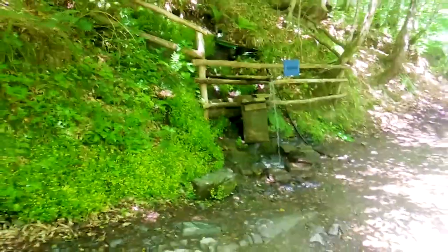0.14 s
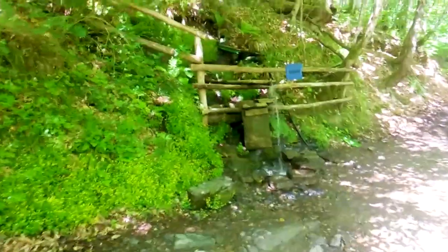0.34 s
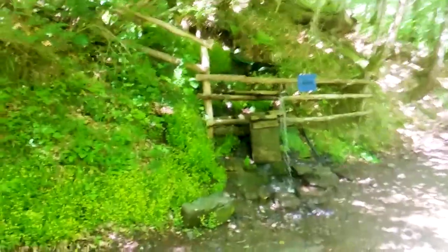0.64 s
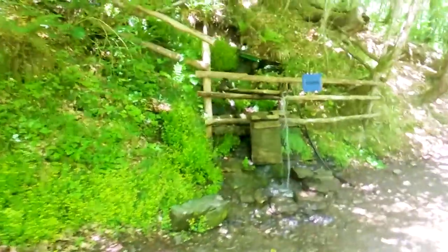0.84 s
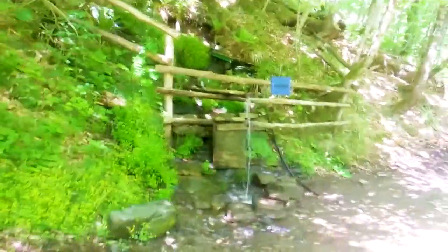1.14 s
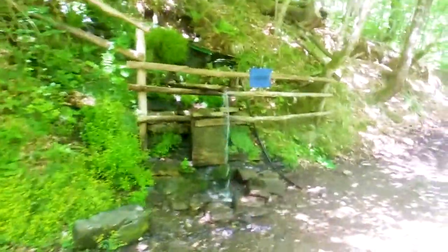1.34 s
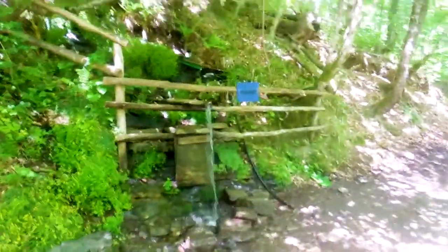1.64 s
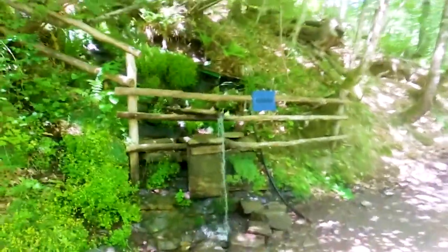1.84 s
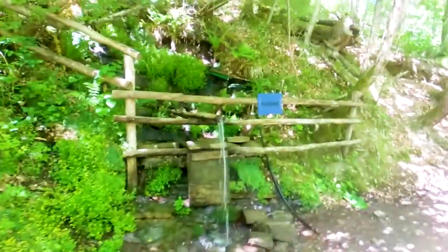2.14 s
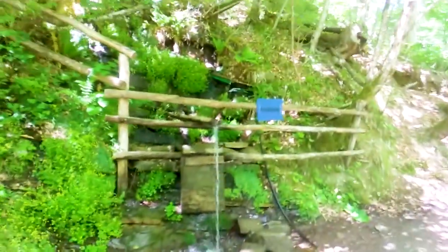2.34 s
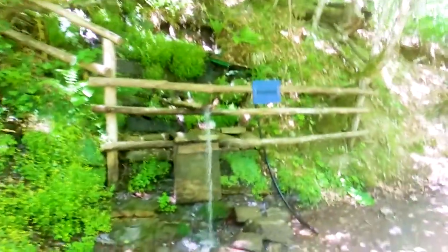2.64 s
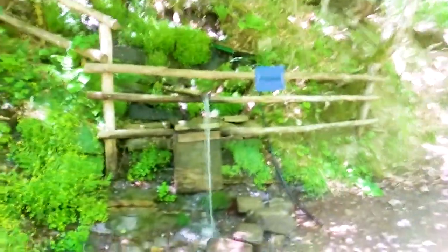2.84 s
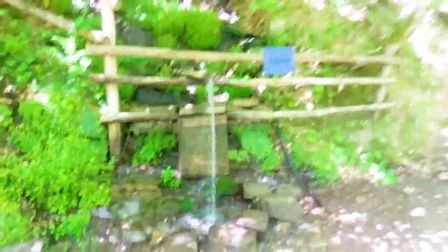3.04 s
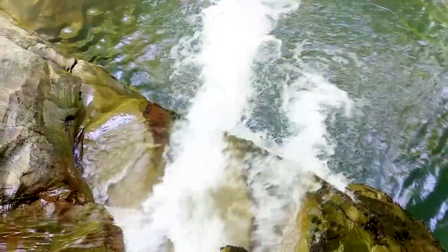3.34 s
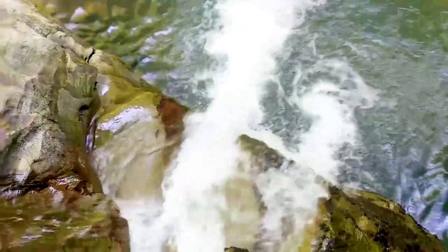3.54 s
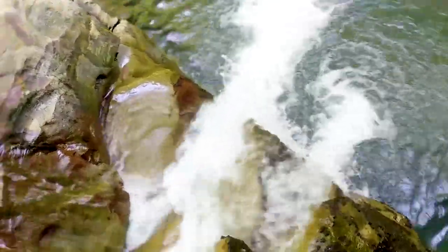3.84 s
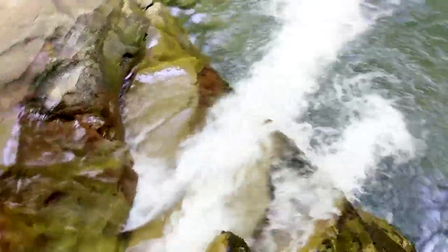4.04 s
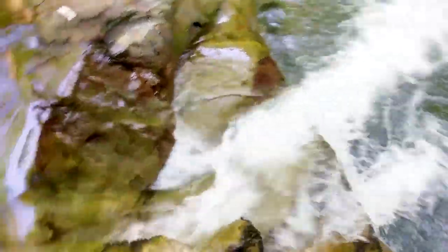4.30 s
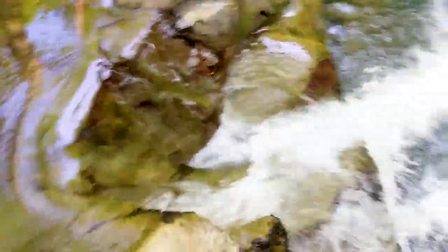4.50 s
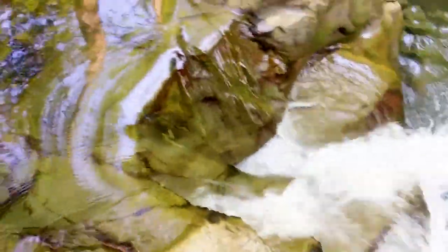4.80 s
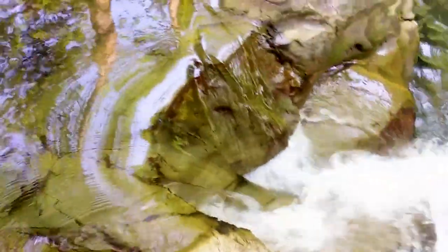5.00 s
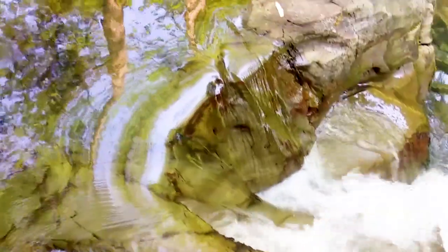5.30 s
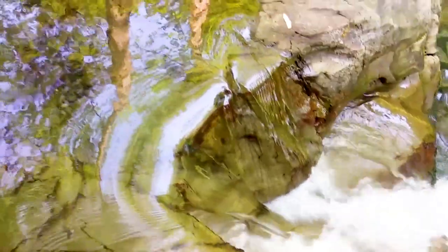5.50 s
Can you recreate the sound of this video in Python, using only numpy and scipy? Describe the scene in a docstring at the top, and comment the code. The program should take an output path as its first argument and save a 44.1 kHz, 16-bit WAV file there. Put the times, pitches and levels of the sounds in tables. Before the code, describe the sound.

A thin jet of spring water spatters brightly on wet stones with splats and plops, then a louder, gurgling mountain stream pours between boulders.

```python
"""Beside a spring spout: a thin jet spatters on wet stones, with sharp splats, small bubbles, plops and knocks.
After a moment of silence a mountain stream fades in, close by, pouring between boulders into a pool.
Water noise is built from random puffs of hiss (drops) and swarms of chirping sines (bubbles), shaped by spectra.
Single splats, knocks, plops, glugs and slops are placed one by one. Both places are heard in mono."""
import sys
import numpy as np
from scipy import signal
from scipy.fft import rfft, irfft, next_fast_len
from scipy.io import wavfile
from scipy.ndimage import map_coordinates

SR = 44100
rng = np.random.default_rng(int(sys.argv[2]) if len(sys.argv) > 2 else 0)


def dump(signal):
    """Clip the signal to [-1, 1] and save it as 16-bit WAV at the path in sys.argv[1]."""
    limited = np.clip(np.atleast_2d(signal).T, -1, 1)
    pcm = np.round(limited * 32767).astype(np.int16)
    wavfile.write(sys.argv[1], SR, pcm)


N = 249606
TIME = np.arange(N) / SR
SPRING_END, STREAM_START = 3.2375, 3.281  # seconds; silence in between


def amp(db):
    """Decibels to gain."""
    return 10 ** (np.asarray(db) / 20)


def unit(x):
    """Scale to rms 1."""
    return x / np.sqrt(np.mean(x ** 2) + 1e-20)


def curves(rows):
    """One value per sample for each column after the time."""
    seconds, *columns = np.transpose(rows)
    return [np.interp(TIME, seconds, column) for column in columns]


def wobble(rate):
    """A smooth random curve, rate knots a second."""
    return map_coordinates(rng.standard_normal(400), [TIME * rate], mode="wrap")


def filtered(x, response):
    """x times a response of frequency."""
    m = next_fast_len(N + 8192)
    return irfft(rfft(x, m) * response(np.fft.rfftfreq(m, 1 / SR)), m)[:N]


def coloured(x, spectrum):
    """x through a (Hz, dB) spectrum, at rms 1."""
    f, db = np.transpose(spectrum)
    return unit(filtered(x, lambda hz: amp(np.interp(np.log(hz + 1), np.log(f), db))))


def bell(hz, centre_hz, octaves):
    """A band of 1 at its centre, falling off as a Gaussian over octaves."""
    return np.exp(-.5 * (np.log2((hz + 1) / centre_hz) / octaves) ** 2)


def swept(x, band):
    """x with one moving band raised or lowered."""
    hz, t, z = signal.stft(x, SR, nperseg=512)
    seconds, *columns = np.transpose(band)
    centre_hz, db, octaves = (np.interp(t, seconds, column) for column in columns)
    gain = amp(db * bell(hz[:, None], centre_hz, octaves))
    return signal.istft(z * gain, SR, nperseg=512)[1][:N]


def patchy(x, depth_db, width_hz, life):
    """Splashes shift about, so narrow bands swell and fade on their own (life in s). Rms 1."""
    hz, t, z = signal.stft(x, SR, nperseg=1024)
    knots = rng.standard_normal((300, 300))
    grid = np.meshgrid(hz / width_hz, t / life, indexing="ij")
    field = map_coordinates(knots, grid, order=1, mode="wrap")
    return unit(signal.istft(z * amp(depth_db * unit(field)), SR, nperseg=1024)[1][:N])


def add(track, s, sound):
    """Mix a sound into the track at time s."""
    part = track[max(round(s * SR), 0):][:len(sound)]
    part += sound[:len(part)]


def bubble(t, hz, cycles, rise):
    """A pocket of air rings, 60 dB down after some cycles; its pitch climbs as it nears the surface."""
    age = t * hz / cycles
    tone = np.sin(2 * np.pi * hz * t * (1 + rise * np.minimum(age, 2) / 2))
    return tone * amp(-60 * age) * (1 - np.exp(-2 * t * hz))


def bubbles(rate, low_hz, high_hz, cycles, rise, spread_db):
    """A swarm, rate a second, of random size and strength, even in energy per Hz, at rms 1."""
    when, size, strength, sign = rng.random((int(rate * N / SR), 4)).T[..., None]
    hz = low_hz * (high_hz / low_hz) ** size
    k = np.arange(int(cycles / low_hz * SR))
    strength_gain = amp(-spread_db * np.log(np.maximum(strength, 1 / 50)))
    rings = hz * strength_gain * np.sign(sign - .5) * bubble(k / SR, hz, cycles, rise)
    positions = (when * N).astype(int) + k
    return unit(np.bincount(positions.ravel(), rings.ravel(), N)[:N])


def spray(rate, t60, spread_db):
    """Drops land at random, rate a second; each bursts into a short puff of hiss. Rms 1."""
    chance, strength = rng.random((2, N))
    hits = (chance < rate / SR) * amp(-spread_db * np.log(np.maximum(strength, 1 / 100))) ** 2
    power = signal.lfilter([1], [1, -amp(-120 / (t60 * SR))], hits)
    return unit(np.sqrt(power) * rng.standard_normal(N))


# How hard the wandering jet strikes bare stone. Each row: time in seconds, relative level of its spatter in dB.
JET_FORCE = [(0, -34.5), (0.08, -37.5), (0.18, -31.5), (0.32, -33.5), (0.55, -32.5), (0.64, -36.5),
             (0.76, -32.5), (0.9, -34), (1.03, -35.5), (1.13, -33.5), (1.24, -34.5), (1.3, -32),
             (1.45, -35), (1.57, -32), (1.87, -33.5), (1.92, -36), (2.03, -32.5), (2.07, -34.5),
             (2.42, -32.5), (2.5, -34.5), (2.55, -33), (2.64, -35.5), (2.76, -32.5), (2.9, -33),
             (3.22, -32)]
# Spectra of the spatter on stone, the finest spray and the stirred puddle.
# Each row: frequency in Hz, relative density in dB per Hz.
SPATTER_SPECTRUM = [(710, -48), (1200, -19), (1300, -21.5), (1470, -5.5), (1820, -2.5), (2500, 2),
                    (3790, -3), (4120, -1), (5970, -1.5), (8640, 2.5), (9930, 1), (11000, -9), (14300, -37),
                    (22000, -120)]
MIST_SPECTRUM = [(9000, -10), (10800, 0.5), (12500, 2), (15000, 3), (16000, -31)]
PUDDLE_SPECTRUM = [(60, -50), (125, -26), (160, -8.5), (236, -1), (350, 1), (450, -4), (880, 1),
                   (1170, -4.5), (1450, -5.5), (1900, -8), (3000, -80)]
# The spatter starts out hollow in the midrange.
# Each row: time in seconds, centre in Hz, gain in dB, width in octaves.
MIDRANGE_HOLLOW = [(0.15, 1600, -6.5, 0.14), (0.45, 1450, 1, 0.14), (0.85, 1500, 2.5, 0.23),
                   (2.0, 1420, 5, 0.14)]
MIST_DB, MIST_GROWS = -38.5, 0.93  # usual level; dB gained per dB of spatter
PUDDLE_DB, PUDDLE_WANDER_DB = -39.5, 1  # stirred evenly, with a slight random swell


def spring():
    """The jet breaks into drops that spatter on stone and stir a shallow puddle; striking harder makes more mist."""
    spatter_db, = curves(JET_FORCE)
    mist_db = MIST_DB + MIST_GROWS * (spatter_db - spatter_db[TIME < SPRING_END].mean())
    puddle_db = PUDDLE_DB + PUDDLE_WANDER_DB * wobble(rate=9.87)

    drops = spray(rate=1500, t60=0.15, spread_db=1.5)
    tinkle = bubbles(rate=220, low_hz=1410, high_hz=4743, cycles=170, rise=0.076, spread_db=0.0)
    # tiny bubbles snap on the wet stone
    pips = bubbles(rate=420, low_hz=1395, high_hz=9240, cycles=11, rise=0.055, spread_db=2.5)
    splashing = patchy(drops + amp(-15.5) * tinkle, depth_db=2.8, width_hz=70, life=.045)
    spatter = coloured(splashing + amp(-9) * pips, SPATTER_SPECTRUM)

    ticks = spray(rate=130, t60=0.005, spread_db=3.0)  # stray droplets land on drier stone
    fine_drops = patchy(drops, depth_db=5.0, width_hz=99, life=0.043)
    mist = coloured(fine_drops + amp(-6) * ticks, MIST_SPECTRUM)

    burble = bubbles(rate=110, low_hz=220.5, high_hz=1518, cycles=73, rise=0.23, spread_db=4.0)
    stir = rng.standard_normal(N) + amp(-18.0) * burble
    puddle = coloured(patchy(stir, depth_db=3.0, width_hz=68.7, life=.07), PUDDLE_SPECTRUM)

    mix = amp(spatter_db + 3.0) * spatter + amp(mist_db) * mist + amp(puddle_db) * puddle
    return swept(mix, MIDRANGE_HOLLOW)


# Drops that slap bare stone.
# Each row: start in seconds, relative level in dB, centre in Hz, width in octaves.
STONE_SPLATS = [(0.173, -15, 7800, 0.5), (0.58, -21, 1300, 0.85), (0.7383, -11, 8400, .4),
                (1.016, -19, 9000, 0.64), (1.183, -15, 6800, 0.31), (1.4601, -21, 7700, 0.27),
                (1.4761, -19, 8500, .3), (1.496, -13, 8440, .35), (1.6733, -20, 8530, 0.22),
                (1.755, -15, 8700, 0.23), (1.993, -16, 7600, 0.34), (2.297, -14, 9900, 0.37),
                (2.405, -15, 10200, 0.36), (2.4623, -17, 9560, 0.24), (2.683, -19, 8700, .3),
                (2.721, -12.5, 10000, .28), (2.754, -10.5, 8950, 0.4), (2.794, -16.5, 7900, .2),
                (2.8424, -16, 9700, 0.2), (2.912, -18, 7000, 0.19), (2.9832, -21, 8700, 0.28),
                (3.018, -16, 7900, .2), (3.0445, -13.5, 10500, 0.58), (4.965, -12.5, 9050, 0.2)]


def splats(t60=0.026, fallout_db=-12, fallout_t60=0.41):
    """The biggest drops crack on the stone in bands of hiss; their fragments patter in a weaker, longer tail."""
    out, t = np.zeros(N), np.arange(SR // 10) / SR
    hz = np.fft.rfftfreq(len(t), 1 / SR)
    fade = amp(-60 * t / t60) + amp(fallout_db - 60 * t / fallout_t60)
    for s, db, centre_hz, octaves in STONE_SPLATS:
        noise = rng.standard_normal(len(t))
        hiss = irfft(rfft(noise) * bell(hz, centre_hz, octaves))
        add(out, s, amp(db - 8.5) * unit(hiss) * fade)
    return out


# Dull knocks close by the microphone. Each row: start in seconds, relative level in dB, rise in seconds.
DULL_KNOCKS = [(0.2578, -19.5, .0002), (0.272, -30, 0.00086), (0.335, -26, .003), (0.424, -21, 0.0045),
               (0.438, -22, 0.0053)]
# What they ring with. Each row: frequency in Hz, relative level in dB, time to fall 60 dB in seconds.
RING_MODES = [(253, 1, 0.044), (483, 0.5, 0.019), (800, 0, 0.022), (1120, -1, 0.015), (1710, 1, 0.009)]


def knock():
    """Heavily damped bumps, the soft ones blurred; neighbouring modes start in opposite directions."""
    out, t = np.zeros(N), np.arange(SR // 8) / SR
    ring = np.zeros(len(t))
    for k, (hz, db, t60) in enumerate(RING_MODES):
        ring += (-1) ** k * amp(db - 60 * t / t60) * np.sin(2 * np.pi * hz * t)
    for s, db, rise in DULL_KNOCKS:
        add(out, s, amp(db) * ring * (1 - np.exp(-t / rise)))
    return out


# Drops that trap air in the water.
# Each row: start in seconds, relative level in dB, bubble pitch in Hz, further gain of the slap in dB.
WATER_PLOPS = [(0.6818, -22.5, 2710, -16), (0.7382, -20, 3290, -10), (0.7921, -26, 3200, -18),
               (1.0542, -19.5, 3690, -2), (1.1822, -14.5, 2620, -7), (1.54, -27, 1850, -14),
               (1.589, -25, 1470, -17), (1.6082, -18, 1520, -17), (1.6422, -21, 4200, -9),
               (1.7754, -22, 2410, -14), (2.1735, -16.5, 3980, -5), (2.7536, -19, 2410, -13),
               (2.855, -26, 955, -7), (2.9836, -15.5, 2180, -10), (3.0954, -18, 2400, -15),
               (3.1487, -19.5, 2320, -15), (3.154, -24, 920, -9), (5.2653, -13, 1630, -20),
               (5.272, -14, 3220, -15)]


def plops(cycles=55, slap_t60=0.023, slap_below=0.27, slap_octaves=0.31):
    """A drop slaps the water, a little lower in pitch than the bubble that it traps; the bubble chirps upward."""
    out, t = np.zeros(N), np.arange(SR // 12) / SR
    f = np.fft.rfftfreq(len(t), 1 / SR)
    for s, db, hz, slap_db in WATER_PLOPS:
        noise = rng.standard_normal(len(t))
        slap_hz = hz * 2 ** -slap_below  # slap_below is in octaves
        slap = irfft(rfft(noise) * bell(f, slap_hz, slap_octaves), len(t))
        add(out, s, amp(db + slap_db) * unit(slap) * amp(-60 * t / slap_t60))
        add(out, s, amp(db - 2.0) * bubble(t, hz, cycles, rise=0.07))
    return out


def fade_in(depth_db, length=0.22):
    """Gain that climbs in an S-curve from depth_db down to full as the stream begins (length in s)."""
    done = np.clip((TIME - STREAM_START) / length, 0, 1)
    return amp(-depth_db * (1 + np.cos(np.pi * done)) / 2)


# The surging of the chute. Each row: time in seconds, relative level of its rush in dB.
CHUTE_FLOW = [(3.5, -27), (3.56, -24.5), (3.59, -26.5), (3.64, -25), (3.8, -23.5), (3.89, -25.5),
              (4.04, -27.5), (4.13, -24), (4.33, -24), (4.45, -24.5), (4.67, -25), (4.76, -28), (4.85, -28),
              (4.91, -26), (5.02, -28), (5.12, -27.5), (5.18, -29.5), (5.28, -26), (5.43, -26.5),
              (5.47, -27), (5.55, -28.5), (5.63, -28.5)]
# The air driven under. Each row: time in seconds, relative level of the gurgle in dB.
AIR_FLOW = [(3.5, -26.5), (3.66, -24.5), (3.86, -21.5), (3.96, -29), (4.12, -24), (4.38, -25.5),
            (4.58, -20.5), (4.69, -27), (4.82, -23.5), (4.92, -26), (5.02, -29), (5.11, -22.5), (5.18, -26),
            (5.28, -23), (5.42, -24), (5.5, -24), (5.65, -26)]
# The microphone swings part of the way from the chute to the boulders.
# Each row: time in seconds, share turned from 0 to 1.
MICROPHONE_TURN = [(4.4, 0.07), (4.8, 0.47)]
# Spectra of gurgle, churn and foam, the last two also with the microphone turned.
# Each row: frequency in Hz, relative density in dB per Hz.
GURGLE_SPECTRUM = [(41, -72), (70, -54), (118, -20), (200, -6.5), (221, -2.5), (281, -6), (323, -3.5),
                   (400, -9), (546, -5), (646, -19), (750, -15.5), (980, -55), (1650, -120)]
CHURN_SPECTRUM = [(350, -31), (600, -0.5), (739, -7), (850, -1.5), (1160, -12.5), (1320, -8.5),
                  (1810, -9.5), (1960, -10), (2920, -11), (3600, -8), (4800, -23), (6240, -44),
                  (10600, -120)]
CHURN_TURNED_SPECTRUM = [(350, -27), (600, -6), (880, -5.5), (1100, -17), (1290, -3), (1680, -2.5),
                         (1990, -13), (2610, -7.5), (3190, -4), (4210, -24), (4800, -22), (6240, -38),
                         (10600, -120)]
FOAM_SPECTRUM = [(2470, -17), (4200, -0.5), (4910, -2.5), (5750, -1.5), (7820, 2), (9620, 1), (10600, -1.5),
                 (14200, -11.5), (15100, -10), (16000, -19)]
FOAM_TURNED_SPECTRUM = [(2470, -27), (4200, -4), (4970, 0.5), (6180, -6.5), (7690, 2), (10500, -8),
                        (11900, -0.5), (13800, -11), (15200, -9), (16000, -20)]
# The midrange of the churn fills in as the stream swells.
# Each row: time in seconds, centre in Hz, gain in dB, width in octaves.
CHURN_OPENING = [(3.35, 1390, -2, .6), (3.68, 1480, -2, 0.38), (3.82, 1400, 1.5, 0.77),
                 (4.3, 1560, -0.5, 0.32), (4.7, 1400, -1, 0.54)]
# A band of the foam's hiss shifts in pitch and strength as the microphone moves.
# Each row: time in seconds, centre in Hz, gain in dB, width in octaves.
FOAM_SHEEN = [(3.45, 6000, -3.5, .25), (4.02, 6100, 0, 0.19), (4.15, 6850, -0.5, 0.092),
              (4.35, 6660, 2.5, 0.12), (4.72, 5570, 5.5, 0.1), (4.98, 5400, -1.5, .1), (5.17, 5250, 2, .08),
              (5.26, 5200, 0.5, 0.23), (5.44, 5200, -0.5, 0.19), (5.495, 5170, -5.5, 0.25),
              (5.57, 5300, -2, 0.21), (5.63, 6300, 7.5, .08)]
CHURN_GROWS = 1.08  # dB of churn gained per dB of rush
GULP_DB = 1  # random swell of the gurgle


def stream():
    """The chute drives air under: big pockets gurgle; middling ones churn and foam bursts, both with the flow."""
    flow_db, = curves(CHUTE_FLOW)
    churn_db = flow_db.mean() + CHURN_GROWS * (flow_db - flow_db.mean())
    gurgle_db = curves(AIR_FLOW)[0] - 0.2 + GULP_DB * wobble(rate=14)
    turned = np.clip(curves(MICROPHONE_TURN)[0], 0, 1)

    def swing(x, facing, aside):
        """Crossfade between two spectra as the microphone turns."""
        return (1 - turned) * coloured(x, facing) + turned * coloured(x, aside)

    pockets = bubbles(rate=260, low_hz=179.9, high_hz=931, cycles=33.0, rise=0.095, spread_db=1.35)
    pouring = pockets + amp(4.5) * spray(rate=600, t60=0.05, spread_db=1.0)
    gurgle = coloured(patchy(pouring, depth_db=1.4, width_hz=63.5, life=.05), GURGLE_SPECTRUM)

    swarm = bubbles(rate=900, low_hz=667.5, high_hz=4570, cycles=57, rise=0.057, spread_db=1.0)
    froth = swarm + amp(9.0) * spray(rate=1300, t60=0.1, spread_db=0.5)
    froth = patchy(froth, depth_db=3.5, width_hz=55, life=.045)
    churn = swept(swing(froth, CHURN_SPECTRUM, CHURN_TURNED_SPECTRUM), CHURN_OPENING)

    fizz = patchy(spray(rate=1600, t60=0.099, spread_db=1.75), depth_db=3.0, width_hz=85, life=.07)
    foam = swept(swing(fizz, FOAM_SPECTRUM, FOAM_TURNED_SPECTRUM), FOAM_SHEEN)

    rush = amp(churn_db + 0.7) * churn + amp(flow_db + 2.0) * foam
    return fade_in(depth_db=12) * (amp(gurgle_db) * gurgle + rush)


# Large air pockets in the stream. Each row: start in seconds, relative level in dB, pocket pitch in Hz.
POCKET_GLUGS = [(3.305, -13.5, 397), (3.325, -14, 500), (3.535, -5.5, 225), (3.639, -8, 256),
                (3.747, -10.5, 265), (3.842, 3.5, 502), (3.862, -3, 875), (3.931, -9, 231),
                (4.014, -8.5, 244), (4.096, -1.5, 285), (4.104, -6, 820), (4.138, -1.5, 346),
                (4.196, -10, 240), (4.311, -1.5, 244), (4.412, -3, 294), (4.471, -2, 239), (4.52, -1, 322),
                (4.622, -7, 328), (4.757, -3, 263), (4.884, -8, 253), (4.915, -1, 307), (4.936, 6.5, 513),
                (5.2, 5.5, 221), (5.395, -1.5, 308), (5.604, 1, 245)]


def glugs(cycles=18, swell=0.012):
    """Single large air pockets swell up (swell in s) and boom in the pool."""
    out, t = np.zeros(N), np.arange(SR // 6) / SR
    for s, db, hz in POCKET_GLUGS:
        boom = bubble(t, hz, cycles, rise=0.067)
        add(out, s, amp(db) * boom * (1 - np.exp(-(t / swell) ** 2)))
    return out


# Water slops against the boulders.
# Each row: time of the peak in seconds, length in seconds, relative level in dB, centre in Hz.
BOULDER_SLOPS = [(4.676, 0.11, -29, 3100), (4.9, 0.074, -33, 3320), (5.385, 0.088, -30, 3060),
                 (5.545, 0.08, -28, 3350)]


def slops(octaves=0.14):
    """Each slop swells and ebbs as a cloud of small bubbles of much the same size."""
    out = np.zeros(N)
    cloud = bubbles(rate=1000, low_hz=2440, high_hz=4170, cycles=60, rise=0.046, spread_db=0.5)
    for s, length, db, centre_hz in BOULDER_SLOPS:
        band = unit(filtered(cloud, lambda hz: bell(hz, centre_hz, octaves)))
        out += amp(db) * band * np.exp(-(2 * (TIME - s) / length) ** 2)
    return out


def scene():
    """First the spring, then the stream, alike in both ears; splats and plops are heard at both."""
    at_spring, at_stream = TIME < SPRING_END, TIME > STREAM_START
    mono = (spring() + knock()) * at_spring
    mono += (stream() + glugs() + slops()) * at_stream
    mono += (splats() + plops()) * (at_spring | at_stream)
    return np.array([mono, mono])


def record(dry, low_cut_hz=125, top_hz=15900):
    """The microphone sheds the deep bass and falls off steeply above its band limit."""
    high_pass = signal.butter(3, low_cut_hz, "highpass", fs=SR, output="sos")
    thin = signal.sosfilt(high_pass, dry)
    return np.array([filtered(x, lambda hz: 1 / (1 + (hz / top_hz) ** 200)) for x in thin])


dry = scene()
out = record(dry)
dump(out)
```